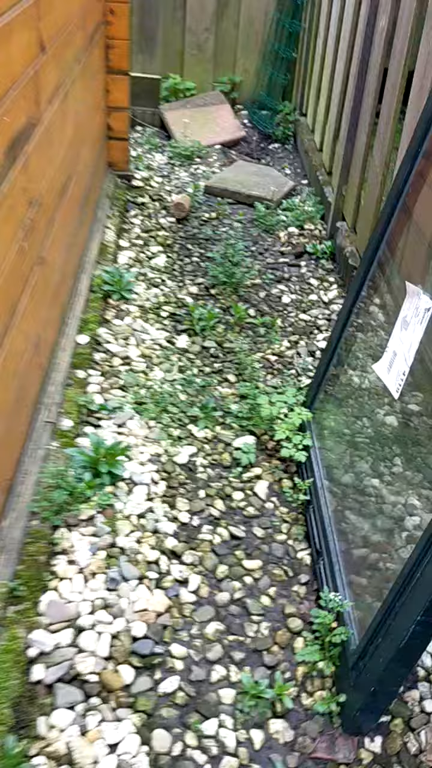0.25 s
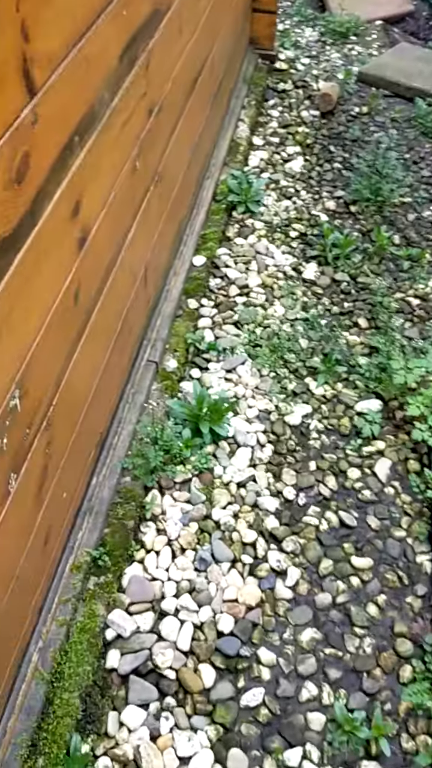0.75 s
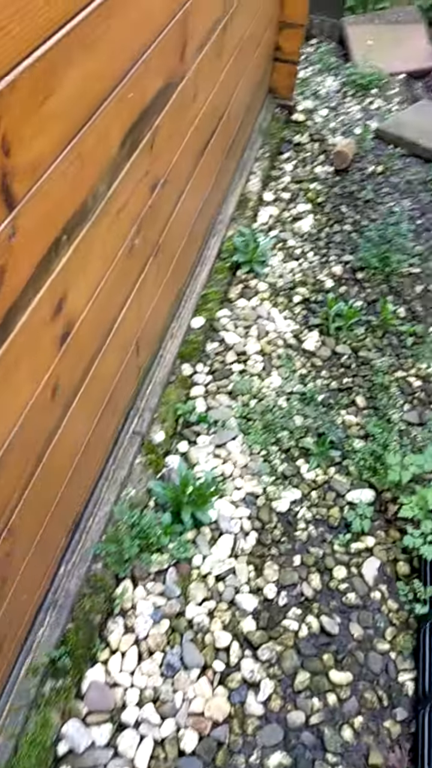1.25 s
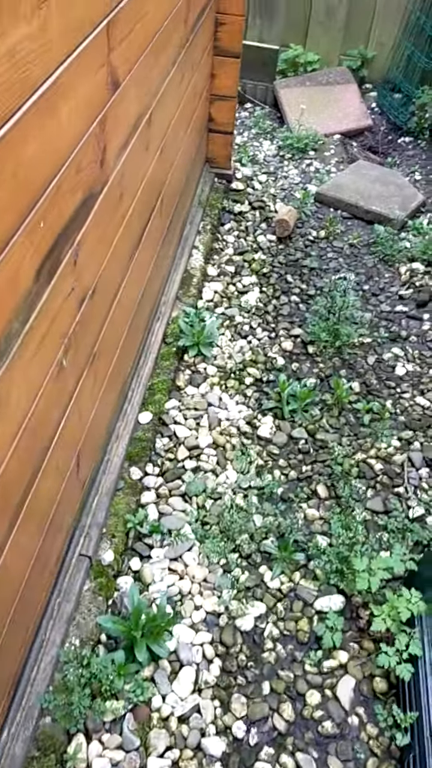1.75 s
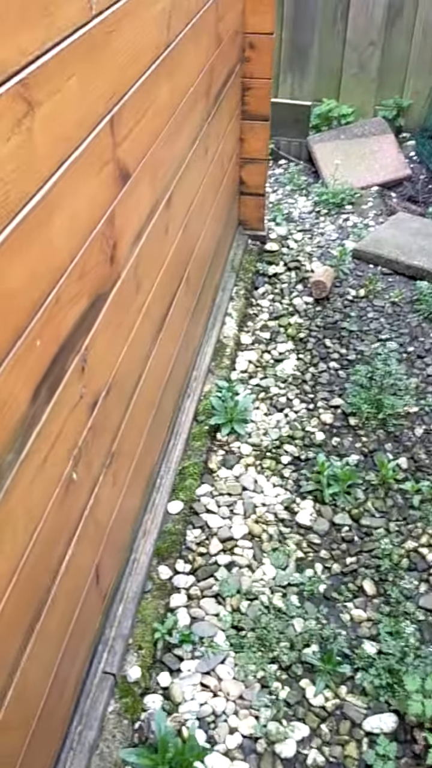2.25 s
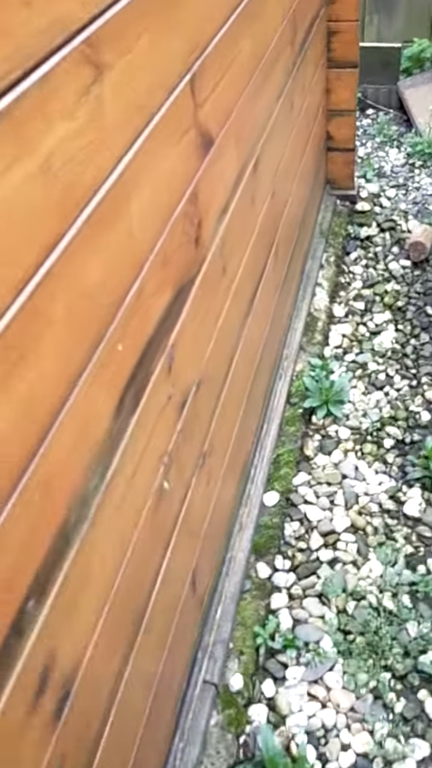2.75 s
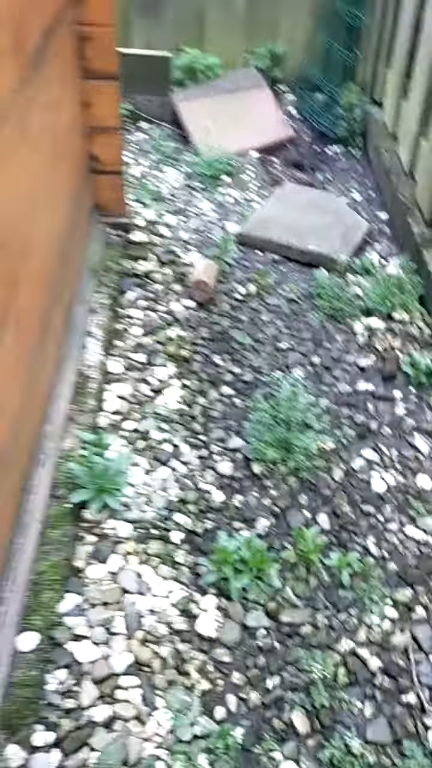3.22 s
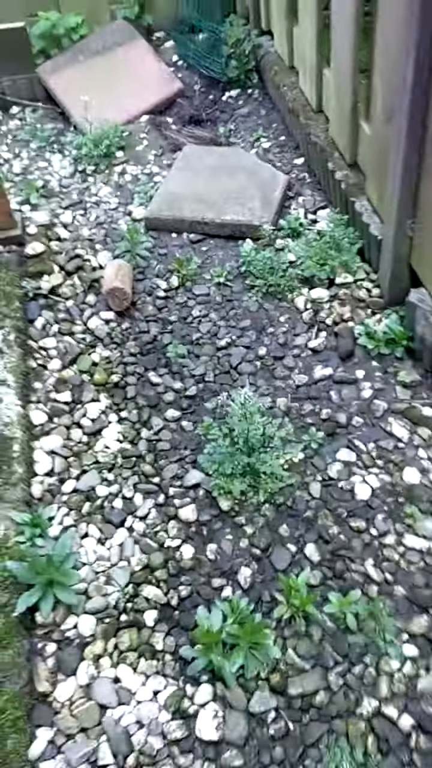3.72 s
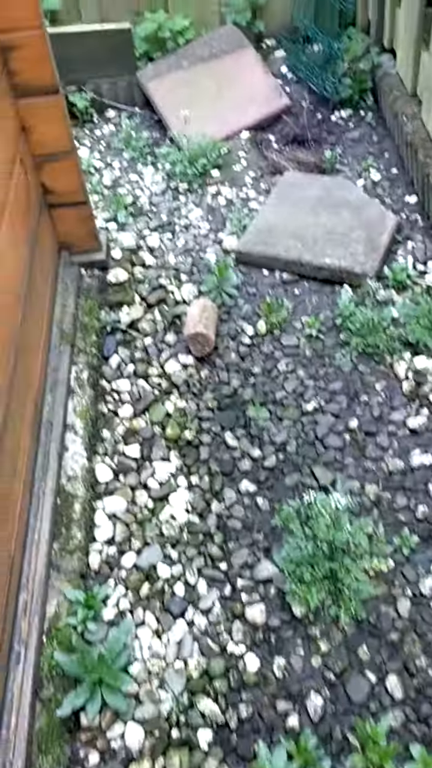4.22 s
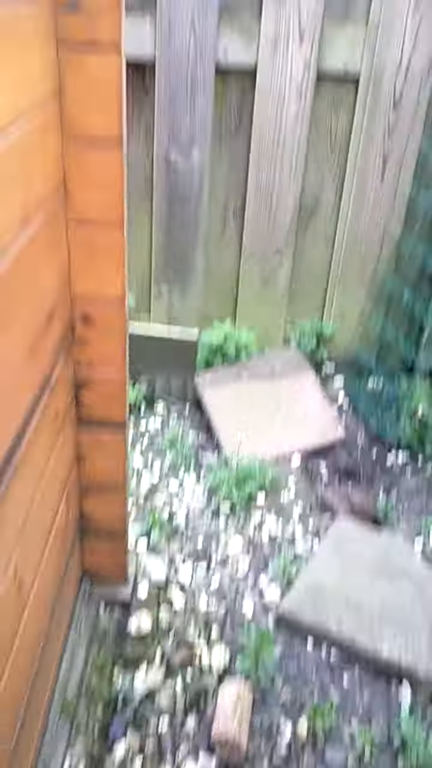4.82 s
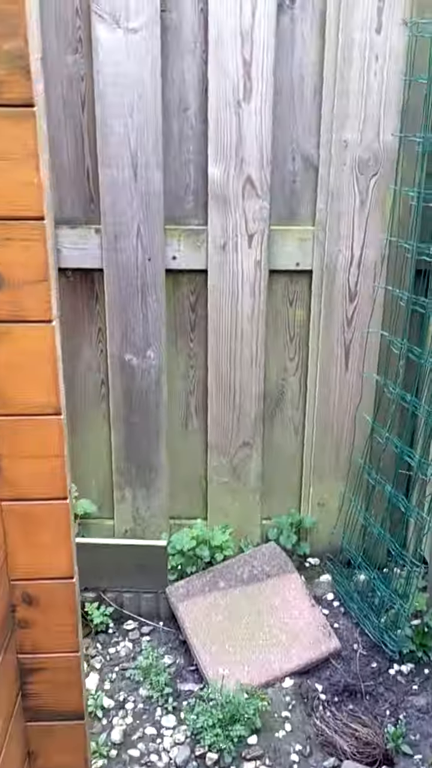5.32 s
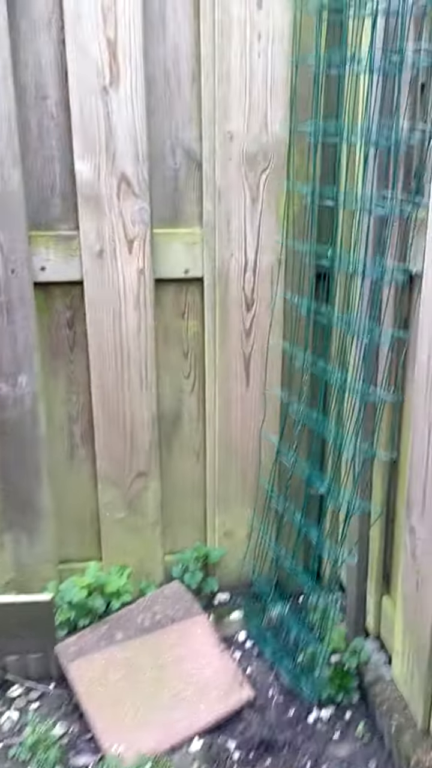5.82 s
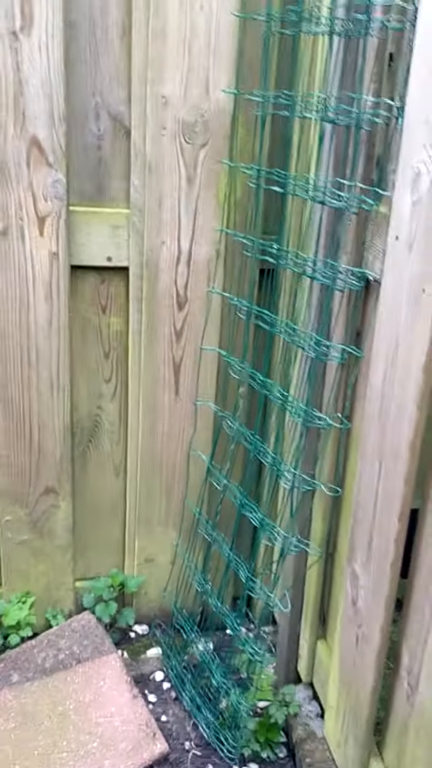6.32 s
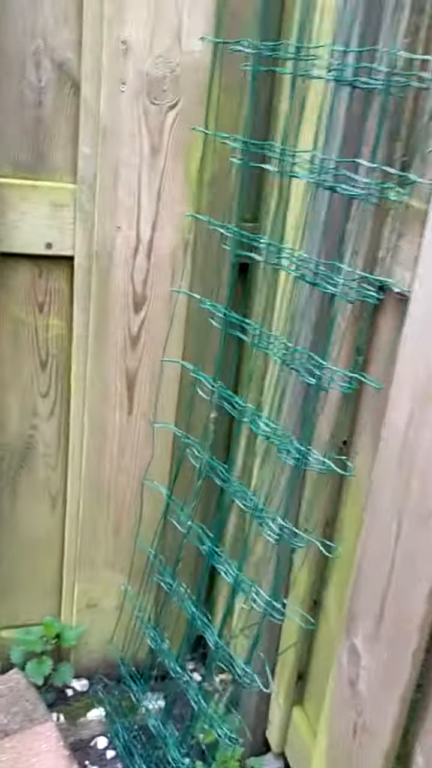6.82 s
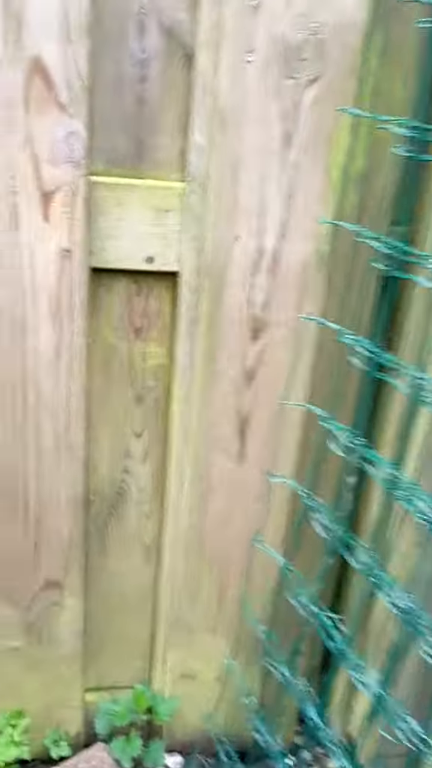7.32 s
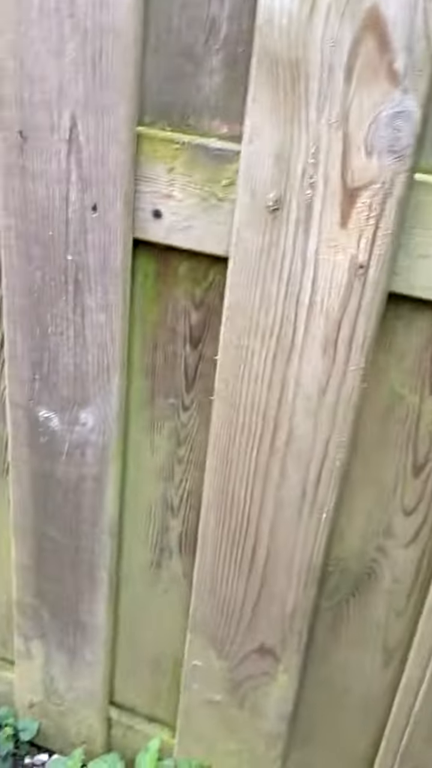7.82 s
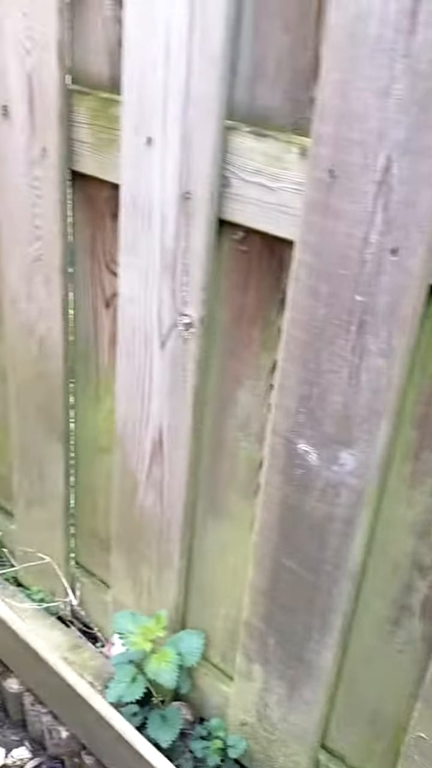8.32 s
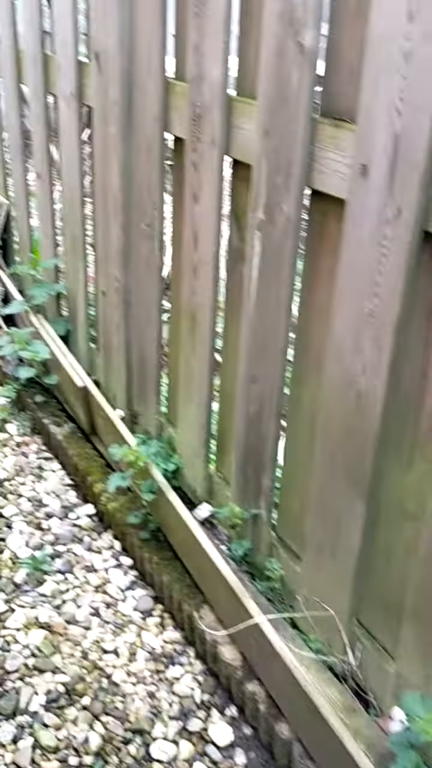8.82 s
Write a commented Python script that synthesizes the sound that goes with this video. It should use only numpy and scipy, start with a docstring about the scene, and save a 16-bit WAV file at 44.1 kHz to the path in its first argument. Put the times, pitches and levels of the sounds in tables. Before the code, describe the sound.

Someone walks on a pebble path in a quiet garden, stones grinding and clicking underfoot, with light handling knocks.

```python
"""Pebble walk behind a shed

Someone walks over loose pebbles in a narrow passage between a shed and a fence, phone in hand.
Stones clack together over the grinding of the bed under the soles, and the boards throw the clacks
back. Cloth and fingers rustle, swipe and bump the phone; soft thuds travel up the arm.
Behind it all a quiet garden hums, and a far bird whistles once."""
import sys
import numpy as np
from scipy import signal
from scipy.fft import rfft, irfft, next_fast_len
from scipy.io import wavfile
from scipy.ndimage import uniform_filter1d

SR = 44100
rng = np.random.default_rng(int(sys.argv[2]) if len(sys.argv) > 2 else 0)


def waveform_to_disk(signal):
    """Save audio, clipped to [-1, 1], as 16-bit WAV at the path in sys.argv[1]."""
    frames = np.transpose(np.atleast_2d(signal))
    scaled = np.clip(frames, -1, 1) * 32767
    samples = np.round(scaled).astype(np.int16)
    wavfile.write(sys.argv[1], SR, samples)


N = 399634

# Featured stone hits, each in four bands:
# (time [s], dull [dB], stony [dB], sharp [dB], fine [dB], pitch [Hz], contact [ms])
STONE_HITS = [(.0571, -70, -29.5, -41, -30, 3600, 0.88), (.0927, -69, -33, -42, -53, 1710, 1.07),
              (.1176, -81, -30, -43, -54, 2400, 1.45), (.1818, -74, -55, -34.5, -26, 1410, 2.4),
              (.2726, -65, -23, -44, -22.5, 2520, 1.3), (.4166, -75, -40, -39, -48, 2150, 1.4),
              (.458, -61, -37.5, -58, -36, 2300, 1.3), (.5115, -42, -35, -42, -36, 2140, 0.99),
              (.9758, -48, -54, -68, -39, 1390, 0.53), (1.1372, -43, -43, -65, -39, 1700, 1.2),
              (1.3006, -50, -43, -40, -39, 1200, 0.92), (1.3354, -39.5, -33, -33.5, -32, 1115, 3.8),
              (1.4268, -78, -48, -51, -44, 1420, 1.7), (1.4755, -55, -50, -48, -49, 2370, 3.5),
              (1.6221, -76, -67, -49, -39, 1850, 0.75), (1.9822, -48, -45, -43, -41, 2020, 2.1),
              (2.1157, -41, -34, -52, -54, 1110, 2.2), (2.1332, -67, -56, -56, -43, 3200, 2),
              (2.1563, -50, -46, -60, -74, 1160, 3.3), (2.1975, -45.5, -41, -52, -50, 2020, 1.4),
              (2.2473, -46, -34, -39, -33, 1140, 1), (2.2667, -70, -52, -50, -47, 2090, 1.5),
              (2.3521, -56, -42, -61, -56, 1200, 0.67), (2.7034, -50, -36, -46.5, -55, 1940, 3.3),
              (2.711, -52, -37.5, -65, -78, 1514, 1.15), (2.7505, -45.5, -41, -49, -60, 2000, 1.16),
              (2.7634, -49.5, -57, -50, -40, 2000, 2.2), (2.9767, -50, -34.5, -37.5, -58, 3700, 1.2),
              (3.021, -61, -37, -53, -71, 1245, 1.6), (3.0646, -46, -29.5, -44, -50, 2490, 1.8),
              (3.1147, -59, -34, -28.5, -37, 3930, 1.9), (3.2902, -61, -39.5, -35.5, -39, 1200, 1.06),
              (3.3402, -50, -29.5, -37, -55, 2840, 0.82), (3.369, -65, -34.5, -44, -49, 2420, 1.1),
              (3.4409, -47.5, -34, -30, -36, 2390, 2.6), (3.5361, -49, -33.5, -38.5, -42, 2570, 2.1),
              (3.6191, -45, -33, -39, -38, 1710, 1), (3.6781, -41, -25, -34, -33, 2700, 1.53),
              (3.7211, -53, -26.5, -42, -33, 2230, 1.33), (3.759, -46, -23.5, -31, -40, 1670, 1.76),
              (3.8175, -40, -27, -39, -31, 1890, .66), (3.8461, -39, -25, -31.5, -48, 1716, 1.24),
              (3.9055, -48, -22.5, -26, -35, 2900, 0.81), (3.9739, -66, -31, -28, -40, 2750, 0.91),
              (3.995, -63, -26.5, -31.5, -56, 4370, 1.5), (4.0095, -71, -33, -48, -71, 4700, 2.3),
              (4.061, -73, -36, -41.5, -51, 4200, 2.4), (4.0881, -50, -31, -23.5, -26, 4320, 1.45),
              (4.1751, -84, -34, -45, -60, 2590, 1.3), (4.2468, -56, -38, -47, -69, 2760, 1.7),
              (4.303, -48, -31.5, -45, -57, 2480, 1.5), (4.445, -76, -44, -44.5, -55, 1612, 1.43),
              (4.6612, -71, -36, -54, -48, 4000, 0.89), (4.6815, -73, -39, -35, -31, 3200, 5.6),
              (4.7615, -59, -33, -41, -51, 1612, 0.74), (4.8042, -61, -38, -37, -45, 1860, 0.73),
              (4.8637, -36.5, -4.5, -11, -10, 3800, 0.44), (4.8714, -72, -30, -46, -36, 2170, 3.8),
              (4.9174, -61, -32, -29, -48, 1210, 0.71), (4.9317, -57, -33, -29.5, -47, 1280, 1.8),
              (4.9582, -74, -53, -35, -42, 3080, 1.2), (4.9776, -71, -53, -42, -32, 2990, 2.9),
              (5.112, -77, -59, -49, -33.5, 3080, 2.8), (5.1538, -43.5, -27, -27.5, -25.5, 2880, 0.8),
              (5.2044, -78, -62, -49, -36, 2840, 1.8), (5.229, -78, -66, -56, -30.5, 2480, 1.5),
              (5.3234, -76, -48, -39.5, -44, 1260, 1.5), (5.3718, -46, -33, -40, -55, 1290, 1.04),
              (5.3883, -66, -28.5, -44, -48.5, 3190, 0.98), (5.465, -44, -31.5, -43, -47, 2670, 1.9),
              (5.4902, -68, -35.5, -33.5, -28, 1330, 2.9), (5.524, -44.5, -27.5, -41, -59, 2150, 3),
              (5.5912, -47, -37, -28.5, -22, 1227, 1.8), (5.6585, -60, -32.5, -36.5, -34, 1280, 0.39),
              (5.6947, -73, -53, -35.5, -41, 2530, 2.5), (5.796, -66, -36, -37, -45, 1480, 1.2),
              (5.8168, -40, -37, -57, -64, 1530, 2.2), (5.8368, -57, -31, -35.5, -32, 1730, 1.7),
              (5.897, -73, -37, -36, -31, 2130, 0.72), (5.935, -37.5, -25, -29, -30, 1560, 0.73),
              (6.0395, -32, -29, -33.5, -41, 1230, 1.3), (6.1215, -38, -26.5, -32.5, -39, 1540, 1.5),
              (6.1766, -69, -38, -41, -36, 2500, 1.6), (6.2228, -59, -35, -40, -58, 1980, 0.96),
              (6.31, -69, -36, -40, -35, 1810, 1.5), (6.3684, -50, -29.5, -36.5, -49, 2880, 1.5),
              (6.3915, -61, -40, -43, -49, 1960, 1.8), (6.437, -69, -28, -58, -54, 1500, 1.2),
              (6.5101, -76, -60, -41, -45, 3600, 1.3), (6.5324, -73, -65, -40.5, -51, 1570, 0.74),
              (6.5966, -69, -35, -39, -42, 1640, 1), (6.6365, -69, -34.5, -44, -41, 2950, 2.4),
              (6.7063, -48, -34.5, -39, -33, 2720, 1.75), (6.7464, -59, -34, -32, -13, 1800, 1),
              (6.7648, -50, -42, -30, -23, 2750, 0.88), (6.7762, -65, -43, -55, -30, 1740, 1.4),
              (6.8622, -62, -35, -31, -30, 1770, 0.48), (6.9235, -42, -43, -47, -43, 1118, 5.6),
              (7.002, -68, -53, -36.5, -36, 2780, 5.3), (7.0626, -74, -51, -52, -37, 3190, .8),
              (7.088, -81, -42, -44, -40, 4480, 1.4), (7.1304, -68, -36, -36.5, -44, 3140, 1.15),
              (7.1874, -53, -38.5, -48, -48, 2380, 2.7), (7.2488, -50, -34, -36, -31.5, 1760, 2),
              (7.2737, -58, -21.5, -29, -42.5, 1910, 0.59), (7.3048, -62, -39, -36, -42, 1190, 2),
              (7.3518, -73, -30.5, -42, -50, 1400, 0.76), (7.4155, -69, -66, -54, -43, 2730, 0.83),
              (7.473, -76, -66, -43, -37, 2910, 0.71), (7.5333, -49, -73, -47, -50, 1360, 0.94),
              (7.6652, -46.5, -45, -39, -37, 3250, 2.4), (7.7043, -41.5, -39, -33.5, -25, 1360, 2.9),
              (7.729, -67, -32, -34, -42, 3600, 1.4), (7.7649, -43, -29, -24.5, -23, 4060, 3),
              (7.8091, -40.5, -31, -25, -28, 1440, 2.4), (7.8492, -42, -25.5, -28, -46, 2850, 2.3),
              (7.9328, -66, -38, -43, -49, 2860, 4.2), (8.386, -55.5, -57, -53, -49, 1286, 2)]
# The dull, stony, sharp and fine bands: (low edge [Hz], high edge [Hz], contact stretch [factor])
CLACK_BANDS = [(400, 1710, 1.6), (1200, 4300, 1.36), (5300, 9200, 0.63), (12140, 22000, 1.5)]


def clacks():
    """Stone strikes stone in a short burst, each with its own balance, pitch and contact time."""
    t, out = np.arange(1500) / SR, np.zeros(N)
    time, *band_db, pitch_hz, contact_ms = np.vstack([STONE_HITS, small_clacks()]).T[:, :, None]
    starts = (time - .00055 * contact_ms)[:, 0]  # early, so the attack peaks near the cue
    noise = rng.standard_normal((len(time), len(CLACK_BANDS), len(t)))
    for k, (low, high, stretch) in enumerate(CLACK_BANDS):
        age = 1000 * t / (0.43 * stretch * np.clip(contact_ms, .3, 6))
        force = noise[:, k] * age * np.exp(1 - age)  # rough contact builds up, then lets go
        band = signal.butter(3, [low, min(high, 20000)], "band", fs=SR, output="sos")
        ring = signal.sosfilt(band, force)
        ring /= abs(ring).max(1, keepdims=True)
        if k == 1:  # the stony band carries the stone's own note, shorter for small stones
            envelope = age * np.exp(1 - (0.47 + pitch_hz / 9000) * age)
            ring = 0.52 * ring + 0.19 * envelope * np.sin(2 * np.pi * pitch_hz * t)
        for start, sound in zip(starts, gain_of(band_db[k]) * ring):
            add(out, start, sound)
    return out


# One crunch for each shift of weight:
# (start [s], length [s], grind [dB], dull body [dB], rustle [dB], fine rustle [dB])
CRUNCHES = [(0.044, 0.14, -56.5, -81, -63, -56.5), (0.278, 0.023, -66, -65, -63, -56),
            (0.402, 0.14, -57, -54, -61, -67), (1.159, 0.12, -56.5, -51, -56, -43.5),
            (1.305, 0.035, -51, -53, -55, -56), (1.527, 0.022, -66.5, -67, -68, -65),
            (1.64, 0.1, -61.5, -67.5, -69.5, -64), (2.11, 0.039, -69, -63, -79, -75),
            (2.345, 0.076, -65, -67.5, -75, -66), (2.7, 0.072, -63.5, -81, -85, -79),
            (2.976, 0.17, -58.5, -69, -67.5, -69), (3.197, 0.031, -57, -67, -70, -67),
            (3.328, 0.12, -69, -72, -71, -68), (3.498, 0.16, -59, -66, -61.5, -63),
            (3.642, 0.27, -45, -59, -51, -52.5), (3.973, 0.046, -63, -64.5, -70, -71),
            (4.277, 0.19, -62.5, -87, -67, -65), (4.665, 0.033, -49.5, -57.5, -59, -55),
            (4.759, 0.098, -50.5, -59, -57.5, -53), (4.858, 0.016, -39.5, -54, -52, -48),
            (4.911, 0.055, -52, -70, -58, -52), (5.014, 0.023, -57.5, -77, -57, -52),
            (5.137, 0.031, -56, -67, -66, -52), (5.3, 0.13, -58, -67, -64, -52.5),
            (5.47, 0.14, -50, -67, -60, -51), (5.691, 0.027, -54, -65, -52, -63),
            (5.788, 0.076, -52, -74, -57, -60), (5.97, .1, -50, -59, -62, -60),
            (6.244, 0.27, -57, -89, -69, -60), (6.7, 0.022, -54, -58.5, -72, -65),
            (6.74, 0.051, -51, -64, -58.5, -54), (6.833, 0.03, -50.5, -63, -54.5, -53),
            (6.919, 0.11, -59.5, -61.5, -65, -72), (7.138, 0.018, -55.5, -83, -64, -67),
            (7.273, 0.078, -54, -74, -66, -60), (7.425, 0.036, -63, -70, -68, -66),
            (7.662, 0.033, -55.5, -62.5, -59, -59), (7.74, 0.035, -78, -74, -77, -66),
            (7.81, 0.027, -45, -64, -51, -52), (7.912, 0.043, -74, -79, -78, -58),
            (8.313, 0.098, -77, -73.5, -73, -67)]


def small_clacks(count=130, late_s=.025, scatter_db=5.5):
    """Extra stone-hit rows: chance clacks in and just after the crunches, riding their levels."""
    start, length, grind_db, dull_db, *rustle_db = np.transpose(CRUNCHES)
    pick, when, pitch, contact = rng.random((count, 4)).T
    span = length + late_s
    row = np.searchsorted(np.cumsum(span) / span.sum(), pick).clip(0, len(span) - 1)
    crunch_db = np.array([dull_db, grind_db, *rustle_db])[:, row].T
    lift_db = [1, 8.8, 12, 5]  # each band over its layer of the crunch
    band_db = crunch_db + lift_db + scatter_db * rng.standard_normal((count, 4)).clip(-2, 1.5)
    pitch_hz, contact_ms = 1200 * 3 ** pitch, 0.54 * 3.5 ** contact
    return np.column_stack([start[row] + when * span[row], band_db, pitch_hz, contact_ms])


def crunch_envelopes(attack_db_per_s=899.5, sag_db_per_s=13, release_db_per_s=498.5):
    """Envelopes of the four crunch layers in dB: fast attack, sagging hold, quick release."""
    t = np.arange(0, N + 64, 64) / SR
    start, length, *layers_db = np.transpose(CRUNCHES)[:, :, None]
    age = t - start
    shape_db = attack_db_per_s * np.minimum(age, 0)
    shape_db -= sag_db_per_s * np.clip(age, 0, length)
    shape_db -= release_db_per_s * np.maximum(age - length, 0)
    powers = [(gain_of(db + shape_db) ** 2).sum(0) + 1e-14 for db in layers_db]
    return [np.interp(np.arange(N) / SR, t, 10 * np.log10(power)) for power in powers]


# Gritty midrange of the crunch: (frequency [Hz], level [dB])
GRIND_EQ = [(530, -30.5), (900, -13.5), (1020, -7.5), (1670, -1), (2120, -1), (2640, 0), (2980, -3),
            (4980, -9.5), (5500, -16.5), (7150, -11.5), (12100, -120)]


def grinding():
    """Many small stone contacts under the sole, with a dull body from the packed bed below."""
    grind_db, dull_db = crunch_envelopes()[:2]
    contacts = grains(per_s=600, spread_db=5, ring_ms=2.3, smooth=0.047)
    dull = coloured(contacts, [(120, -29), (230, -2.5), (600, -1.5), (950, 0.5), (1300, -17)])
    return gain_of(grind_db) * coloured(contacts, GRIND_EQ) + gain_of(dull_db) * dull


# Fader ride of the bed between crunches, ducking just after the hardest bump:
# (time [s], body [dB], treble [dB])
SCRAPE_LEVELS = [(0, -62, -61.5), (.31, -60.5, -60), (.325, -78, -83), (.37, -77, -73), (.4, -72.5, -70),
                 (1.1, -68, -67), (1.95, -69, -74), (2.35, -68, -67.5), (2.45, -75, -73.5),
                 (2.95, -72.5, -73.5), (3, -65, -65), (4.6, -62, -64), (5, -61.5, -63), (6.1, -57, -59),
                 (6.6, -64, -61), (7.4, -64.5, -61.5), (7.6, -69, -65), (7.87, -55.5, -59),
                 (8.28, -76, -74.5), (9.06, -83, -85)]
# Body and top end of the scrape: (frequency [Hz], level [dB])
SCRAPE_BODY_EQ = [(120, -39), (200, -9), (407, -9), (557, -1.5), (891, -3.5), (1530, -1.5), (2150, -1.5),
                  (2700, -1.5), (3300, -4), (3900, -8), (6000, -15.5), (7800, -47)]
SCRAPE_TREBLE_EQ = [(3240, -40), (5500, -18.5), (7000, -6), (7930, 2.5), (9570, -11.5), (12300, -4),
                    (15100, 0.5), (16000, -2)]


def scraping():
    """The pebble bed scrapes softly: nearly smooth friction noise with a few faint grains."""
    body_db, treble_db = curves(SCRAPE_LEVELS)
    contacts = grains(per_s=300, spread_db=3.5, ring_ms=3, smooth=3)
    body = gain_of(body_db) * coloured(contacts, SCRAPE_BODY_EQ)
    return body + gain_of(treble_db) * coloured(contacts, SCRAPE_TREBLE_EQ)


# Tight reverb of the passage: (frequency [Hz], time to fall 60 dB [s])
PASSAGE_DECAY = [(400, 0.094), (1000, 0.12), (2800, 0.092), (7000, 0.068), (14000, 0.052)]


def passage_echo(x):
    """Sparse reflections of random sign between the boards, each band dying at its own speed."""
    taps = np.zeros(SR // 2)
    slots = np.arange(60, len(taps) - 20, 20)
    taps[slots + rng.integers(0, 20, len(slots))] = rng.choice([-1., 1.], len(slots))
    hz, t, spectrum = signal.stft(taps, SR, nperseg=128)
    decay = gain_of(-60 * t / value_at(PASSAGE_DECAY, hz)[:, None])
    tail = signal.istft(spectrum * decay, SR, nperseg=128)[1]
    return signal.oaconvolve(x, tail / np.linalg.norm(tail))[:N]


# The microphone's treble humps, and the fine sizzle on top: (frequency [Hz], level [dB])
RUSTLE_EQ = [(2650, -63), (4500, -10.5), (4950, -58), (6840, -6), (7960, 7), (8430, -1.5), (9240, -18.5),
             (10500, -5.5), (13600, -54.5), (22000, -120)]
FINE_RUSTLE_EQ = [(5590, -41), (9500, -25), (11500, -10.5), (15100, 0.5), (16000, -8)]


def rustle():
    """Cloth and fingers rustle with each crunch in fine, bright grains."""
    rustle_db, fine_db = crunch_envelopes()[2:]
    contacts = grains(per_s=500, spread_db=3, ring_ms=1.2, smooth=.6)
    bright = gain_of(rustle_db) * coloured(contacts, RUSTLE_EQ)
    return bright + gain_of(fine_db) * coloured(contacts, FINE_RUSTLE_EQ)


# Envelope of one finger drag: (time [s], level [dB])
SWIPE_LEVELS = [(1.14, -120), (1.151, -69), (1.156, -31.5), (1.166, -26), (1.178, -23.5), (1.195, -20.5),
                (1.203, -34), (1.212, -34.5), (1.24, -120)]
# Its low bump and scratchy top: (frequency [Hz], level [dB])
SWIPE_EQ = [(120, -53), (200, -2), (509, -42), (1400, -12.5), (2020, -21), (2210, -11), (4950, -18.5),
            (7680, -10), (9750, -13), (16000, -2)]


def finger_swipe():
    """Skin drags across the phone's case in a dense, rough scratch."""
    db, = curves(SWIPE_LEVELS)
    contacts = grains(per_s=900, spread_db=2.9, ring_ms=0.86, smooth=0.93)
    return gain_of(db) * coloured(contacts, SWIPE_EQ)


# Handling knocks:
# (time [s], level [dB], push direction [signed factor], push length [ms], port ring against push [dB])
CASE_BUMPS = [(0.3119, -26, -1.1, 0.087, 11), (0.3138, -7, 0.83, 0.23, 7.5),
              (1.1916, -13, -0.87, 0.35, -30), (1.338, -34, 0.57, 5.7, -30), (1.342, -38, -0.71, 2, -30),
              (1.981, -46, 1, 1.4, -36), (3.438, -29, -0.62, 1.1, -15), (3.5401, -33, 0.64, 0.55, -20),
              (3.598, -27.5, 0.88, 0.16, -8), (3.621, -27, 0.74, 0.39, -17),
              (6.0382, -29.5, -0.72, 0.33, -17), (6.9222, -25, -0.73, 0.11, -30)]


def case_bumps(port_hz=13500, port_t60_s=0.00054, bass_cut_hz=110):
    """One-sided pushes on the case; the microphone's bass cut swings them back and its port rings."""
    t, out = np.arange(2000) / SR, np.zeros(N)
    for start, db, direction, push_ms, port_db in CASE_BUMPS:
        age = 1000 * t / np.clip(push_ms, .05, 20)
        push = 4 * age * np.exp(-3 * age) + 0.44 * age * np.exp(1 - age)
        port = gain_of(port_db - 60 * t / port_t60_s) * np.sin(2 * np.pi * port_hz * t)
        add(out, start, direction * gain_of(db) * (push + port))
    return signal.sosfilt(signal.butter(2, bass_cut_hz, "high", fs=SR, output="sos"), out)


# Low-end thumps: (time [s], level [dB], pitch [Hz])
ARM_THUDS = [(1.155, -48, 45), (1.191, -40, 61), (1.287, -59, 40.5), (1.343, -40, 88), (1.448, -46.5, 62.4),
             (3.599, -44, 50.5), (3.623, -46, 50.7), (3.716, -48, 50)]


def arm_thuds():
    """Soft thuds carried through the arm, about two cycles each."""
    out = np.zeros(N)
    for time, db, hz in ARM_THUDS:
        cycles = np.arange(-1.5, 1.5, hz / SR)
        envelope = np.exp(-(cycles / 0.61) ** 2)
        add(out, time - 1.19 / hz, gain_of(db) * envelope * np.cos(2 * np.pi * cycles))
    return out


# Swells of the rumble: (time [s], level [dB])
RUMBLE_LEVELS = [(0, -64.5), (.33, -59.5), (.7, -62.5), (1.19, -62), (1.34, -54), (1.56, -65.5),
                 (3.4, -63.5), (3.73, -57), (3.96, -63.5), (4.69, -61.5), (6.36, -60.5), (7.42, -63),
                 (7.6, -58.5), (8.5, -67.5), (9.06, -76)]
# Its sub-heavy tone: (frequency [Hz], level [dB])
RUMBLE_EQ = [(2.9, -29.5), (5.0, 1), (16, 7.5), (29, -1.5), (102, -8.5), (192, -15.5), (300, -23.5),
             (390, -76), (660, -120)]


def rumble():
    """Air and hand movement at the microphone make a lumpy low rumble."""
    db, = curves(RUMBLE_LEVELS)
    return gain_of(db) * coloured(rng.standard_normal(N), RUMBLE_EQ)


# One thin, arching call: (time [s], level [dB], pitch [Hz])
BIRD_CALL = [(1.78, -85, 5150), (1.81, -78, 5280), (1.885, -75, 5340), (1.92, -95, 5300)]


def far_bird(breath_width_hz=130):
    """A distant bird whistles: a gliding sine, made breathy by smoothed noise."""
    db, hz = curves(BIRD_CALL)
    gate = db > max(BIRD_CALL[0][1], BIRD_CALL[-1][1])
    tone = np.sin(2 * np.pi * np.cumsum(hz) / SR)
    breath = uniform_filter1d(rng.standard_normal(N), int(SR / breath_width_hz))
    return gain_of(db) * gate * tone * unit_rms(breath / 2 + .035)


# Soft outdoor ambience: (frequency [Hz], level [dB])
GARDEN_EQ = [(88, -29), (150, 5), (213, 2), (448, 5.5), (2550, -8.5), (3900, -17.5), (5400, -20.5),
             (7920, -16), (10400, -23), (12900, -25), (15100, -2), (16000, -7)]


def garden(hush_db=-72.5, hum_db=-76.5, hum_hz=97.1, skirt_hz=16.8):
    """A steady garden hush with a faint, wavering hum of narrow-band noise."""
    hush = gain_of(hush_db) * coloured(rng.standard_normal(N), GARDEN_EQ)
    hum_eq = [(hum_hz - skirt_hz, -60), (hum_hz, 0), (hum_hz + skirt_hz, -60)]
    return hush + gain_of(hum_db) * coloured(rng.standard_normal(N), hum_eq)


def grains(per_s, spread_db, ring_ms, smooth):
    """Tiny contacts of very unlike size, each a short puff of noise, over a share of steady noise."""
    sizes = gain_of(spread_db * np.minimum(rng.exponential(1, N), 5))
    hits = sizes * (rng.random(N) < per_s / SR)
    puffs = signal.lfilter([1], [1, -np.exp(-1000 / ring_ms / SR)], hits ** 2)
    return np.sqrt(smooth + puffs / puffs.mean()) * rng.standard_normal(N)


def coloured(x, eq):
    """Shapes x with an EQ curve and sets its rms to 1."""
    size = next_fast_len(N)
    gains = gain_of(value_at(eq, np.fft.rfftfreq(size, 1 / SR)))
    return unit_rms(irfft(rfft(x, size) * gains, size)[:N])


def value_at(points, hz):
    """Reads a curve along a log frequency axis."""
    point_hz, values = np.transpose(points)
    return np.interp(np.log(hz + 1), np.log(point_hz + 1), values)


def curves(rows):
    """One automation curve for each column after the time."""
    times, *columns = np.vstack(rows).T
    return [np.interp(np.arange(N) / SR, times, column) for column in columns]


def gain_of(db):
    return 10 ** (np.asarray(db) / 20)


def unit_rms(x):
    return x / np.sqrt(np.mean(x ** 2) + 1e-20)


def add(mix, start_s, sound):
    part = mix[max(round(start_s * SR), 0):][:len(sound)]
    part += sound[:len(part)]


def scene():
    """Mono mix of steps, handling and ambience; only the clacks feed the passage reverb."""
    stones = clacks()
    steps = stones + gain_of(-6.5) * passage_echo(stones) + grinding() + scraping()
    handling = rustle() + finger_swipe() + case_bumps() + arm_thuds()
    ambience = garden() + rumble() + far_bird()
    return (steps + handling + ambience)[None]


def record(dry):
    """The phone's band limit cuts off the very top end."""
    cutoff_hz = 15850
    lowpass = signal.firwin(511, cutoff_hz, window=("kaiser", 6), fs=SR)
    return signal.oaconvolve(dry, lowpass[None], "same")


dry = scene()
out = record(dry)
waveform_to_disk(out)
```